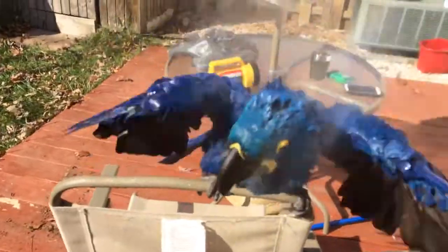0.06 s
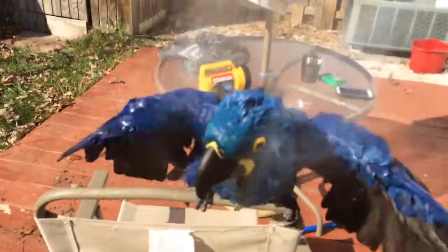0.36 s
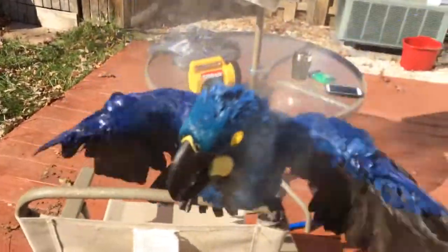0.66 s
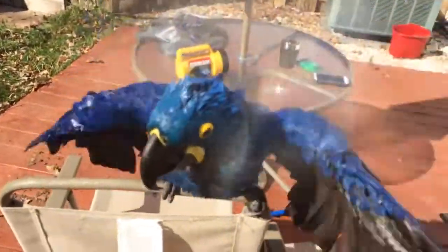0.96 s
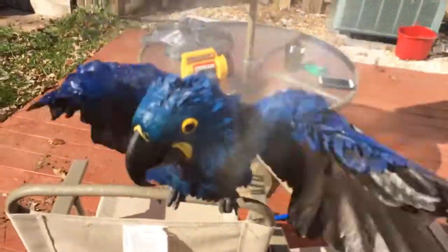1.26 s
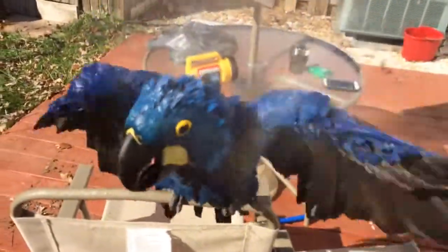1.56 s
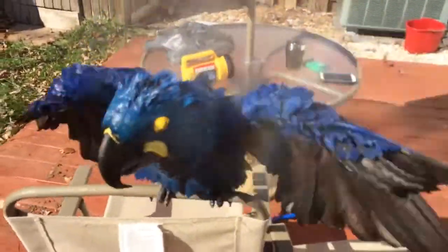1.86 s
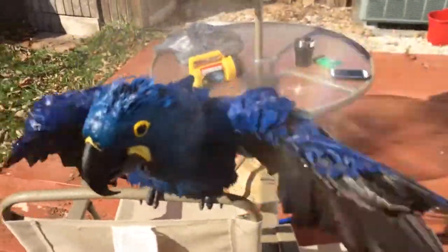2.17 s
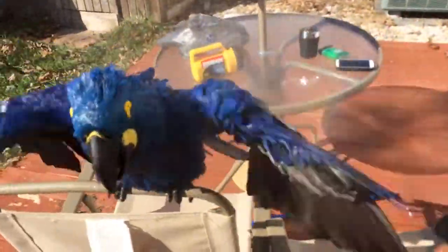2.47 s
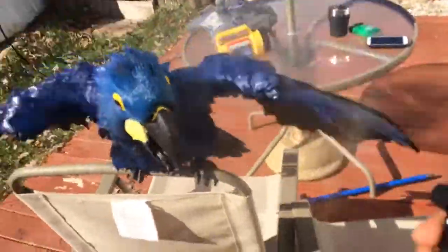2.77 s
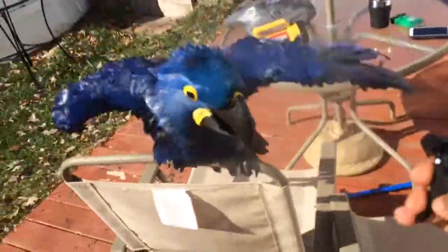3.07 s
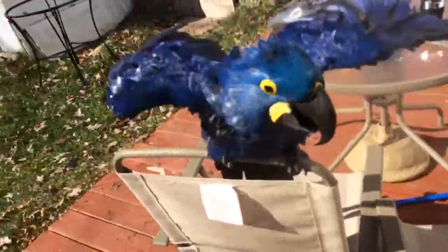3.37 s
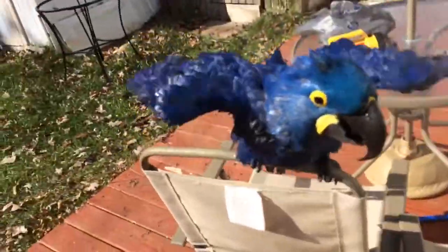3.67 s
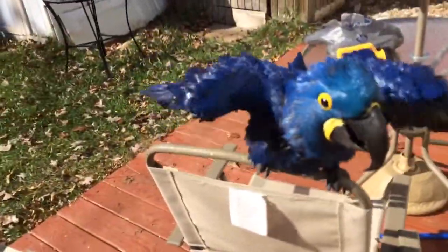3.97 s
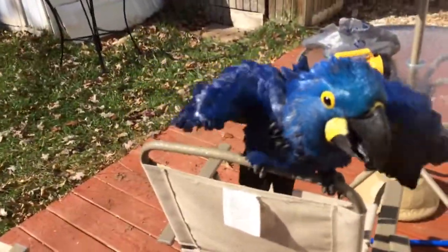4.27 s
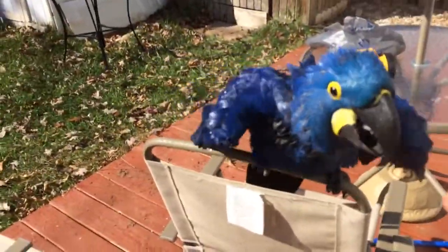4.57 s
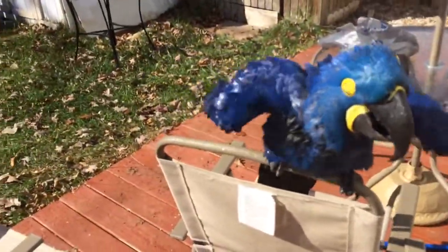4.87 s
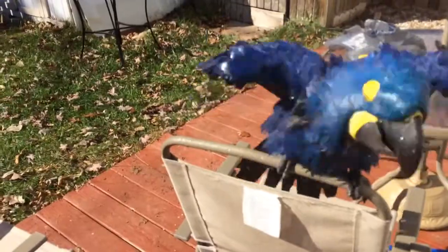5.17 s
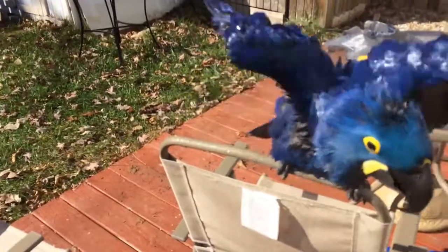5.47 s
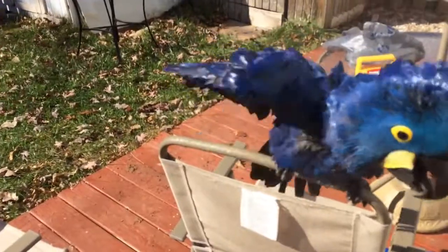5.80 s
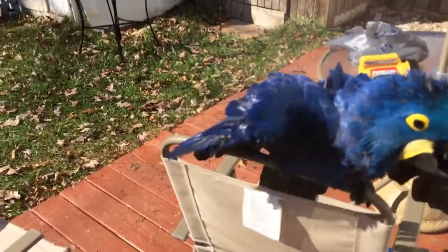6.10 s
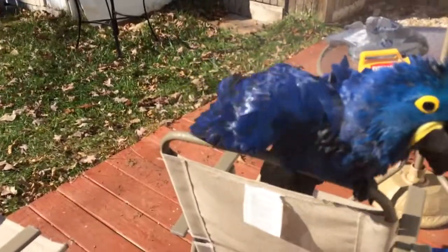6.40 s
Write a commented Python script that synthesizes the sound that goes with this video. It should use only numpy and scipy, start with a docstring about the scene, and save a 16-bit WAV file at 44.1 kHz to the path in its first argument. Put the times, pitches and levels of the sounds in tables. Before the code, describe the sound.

A spray bottle hisses close to the microphone from the start, in bright, even bursts, about three a second. Between squeezes the pump slurps and ticks back, with sharp plastic trigger clicks, tiny gurgles and faint thin whistles of air. A parrot's wings push soft, low puffs against the microphone at about 0.7, 1.8 and 2.6 seconds, and more weakly at 3.1 and 3.5. From around 3 seconds the spray weakens as the pump draws air, and it pauses briefly after 3.7. Weak squeezes follow from 4.3, with short, sputtering spits between about 4.5 and 6 seconds. At 5.5 the parrot gives one very short, raspy squeak. The mist returns with three hisses at about 5.7, 6.0 and 6.3 seconds. A quiet outdoor rumble and light breeze lie underneath, with a faint distant motor hum from about 0.8 to 2.2 seconds. The sound is mono.

```python
"""A spray bottle hisses close by, about three squeezes a second, misting a parrot on a garden deck.
The trigger clicks, water breaks into mist at the nozzle, and the pump slurps and ticks as it springs back.
Midway the pump draws air and spits, the parrot gives one short squeak, and the mist returns.
The bird's wings fan the microphone of a mono phone, over a quiet outdoor rumble."""
import sys
import numpy as np
from scipy import signal
from scipy.fft import rfft, irfft
from scipy.io import wavfile
from scipy.ndimage import uniform_filter1d

SR = 44100
rng = np.random.default_rng(int(sys.argv[2]) if len(sys.argv) > 2 else 0)


def pcm_store(signal):
    """Save signal as 16-bit PCM."""
    levels = np.round(np.clip(np.atleast_2d(signal), -1, 1) * 32767)
    wavfile.write(sys.argv[1], SR, levels.astype(np.int16).T)


N = 288414
T = np.arange(N) / SR


def gain(db):
    """Turn decibels into a number to multiply by."""
    return 10 ** (np.asarray(db) / 20)


def unit(x):
    """Scale a signal to an average strength (rms) of 1."""
    return x / np.sqrt(np.mean(x ** 2))


def gain_at(points, hz):
    """Read the gain at hz from a tone colour: rows of frequency_hz, level_db."""
    frequencies, db = np.transpose(points)
    return gain(np.interp(np.log(hz + 1e-3), np.log(frequencies), db))


def colour(x, points, size=8192):
    """Give a sound a tone colour; white noise keeps its power."""
    gains = unit(gain_at(points, np.fft.rfftfreq(size, 1 / SR)))
    cepstrum = irfft(np.log(gains))
    # make the filter ring only after a sound, never before it
    cepstrum[1:size // 2] *= 2
    cepstrum[size // 2 + 1:] = 0
    return signal.fftconvolve(x, irfft(np.exp(rfft(cepstrum))))[:len(x)]


def ring(x, hz, width_hz):
    """Make a sound ring at one pitch; white noise keeps its power."""
    return signal.lfilter(*signal.iirpeak(hz, hz / width_hz, fs=SR), x) * np.sqrt(SR / np.pi / width_hz)


def noise():
    """White noise."""
    return rng.standard_normal(N)


def band(hz, width_hz):
    """Noise around one pitch, at strength 1."""
    return unit(ring(ring(noise(), hz, width_hz), hz, width_hz))


def wander(rate):
    """A smooth random curve of strength 1 that turns about rate times a second."""
    step = max(int(SR / rate), 1)
    return unit(uniform_filter1d(np.repeat(noise()[:N // step + 1], step)[:N], step))


def swell(s, half_s, power=2):
    """A hump at time s, about 17 dB down half_s to either side; more power flattens its top."""
    hump, away = np.zeros(N), np.abs(T - s) / half_s
    near = away < 4
    hump[near] = np.exp(-2 * away[near] ** power)
    return hump


# tone colour of the outdoor air: frequency_hz, level_db
GARDEN_COLOUR = [(20, -36), (40, -8), (70, -7), (150, -6.5), (300, -15), (400, -10.5), (700, -17),
                 (1500, -17.5), (2400, -26.5), (5000, -30.5), (9000, -36), (12000, -43), (15000, -45)]

def garden(air_db=-49, breeze_db=-55, gust_db=2, hum_hz=91, hum_db=-52):
    """Outdoor rumble, a light breeze, and a distant motor that hums for a while."""
    air = colour(noise(), GARDEN_COLOUR) * gain(air_db + 0.5 * wander(6))
    breeze = band(65, 59) * gain(breeze_db + gust_db * wander(14))
    hum = np.sqrt(2) * np.sin(2 * np.pi * np.cumsum(hum_hz + 0.68 * wander(4.6)) / SR)
    return air + breeze + hum * gain(hum_db) * swell(1.5, half_s=0.74, power=12)


# puffs of air from the wings: middle_s, half_length_s, level_db
WING_PUFFS = [(0.737, 0.023, -41), (1.84, .057, -39), (2.561, 0.021, -35), (3.066, 0.069, -48.5),
              (3.496, 0.032, -43)]

def wings():
    """Air pushed down by the wings thumps the microphone."""
    return band(78, 49) * sum(gain(db) * swell(s, half_s) for s, half_s, db in WING_PUFFS)


# sliding notes of the squeak: start_s, first_pitch_hz, last_pitch_hz, level_db
SQUEAK_NOTES = [(5.452, 517, 410, -22.5), (5.467, 438, 564, -23.5), (5.496, 335, 547, -27)]
# how the throat colours the overtones: frequency_hz, level_db
THROAT_COLOUR = [(700, 0), (1060, -12.5), (1170, 6), (1300, -10), (1550, -2.5), (1800, -1.5), (2000, -21),
                 (2400, -33), (4000, -32)]

def parrot(attack_s=0.0033, note_s=0.015, glide_s=0.0131, onset_s=0.0038):
    """One squeak: a bright, raspy falling note runs into two purer rising ones."""
    out, age = np.zeros(N), T[:SR // 10]
    ease = lambda length_s: np.sin(np.pi / 2 * np.minimum(age / length_s, 1)) ** 2
    fade = ease(attack_s) * np.exp(-(age / note_s) ** 2)
    waver = 1 + 0.031 * wander(500)
    rasp = gain(-15) * band(1550, 600)
    since_start = np.clip(T - SQUEAK_NOTES[0][0], 0, 1)
    brightness = gain(-14) + gain(12) * np.exp(-since_start / onset_s)
    for s, first_hz, last_hz, db in SQUEAK_NOTES:
        span = int(s * SR) + np.arange(len(age))
        hz = first_hz + (last_hz - first_hz) * ease(glide_s)
        phase = 2 * np.pi * np.cumsum(hz * waver[span]) / SR
        overtones = sum(gain_at(THROAT_COLOUR, k * hz) * np.sin(k * phase) for k in range(2, 8))
        voice = np.sin(phase) + brightness[span] * (overtones + rasp[span])
        out[span] += np.sqrt(2) * gain(db) * fade * voice
    return out


# bubbles in the bottle: start_s, pitch_hz
BUBBLES = [(.852, 1410), (1.127, 1720), (1.337, 1570), (2.049, 1560), (2.258, 1820), (2.867, 1280),
           (4.475, 1530)]

def gurgles(level_db=-39, life_s=0.0037, rise=0.061):
    """Each small bubble makes a short rising chirp in a puff of froth."""
    out = np.zeros(N)
    waver = 1 + 0.027 * wander(700)
    froth = gain(-3) * band(1580, 1170)
    for s, hz in BUBBLES:
        span = int(s * SR) + np.arange(int(10 * life_s * SR))
        lives = (span - span[0]) / SR / life_s
        phase = 2 * np.pi * np.cumsum(hz * waver[span] * (1 + rise * lives)) / SR
        out[span] += lives * np.exp(1 - lives) * (np.sin(phase) + froth[span])
    return gain(level_db) * out


# how full the pump is: time_s, water_share (0 is all air, 1 is all water)
PUMP_FILL = [(0, 0.85), (2.6, 1), (3.15, 0.37), (3.6, 0), (4.5, 0), (5.3, .15), (5.7, 0.31), (6.5, 0.42)]

def water(s):
    """Share of water in the pump at time s."""
    return np.clip(np.interp(s, *np.transpose(PUMP_FILL)), 0, 1)


def by_fill(s, empty_and_full):
    """Blend a pair of settings (empty pump, full pump) by the water in it at time s."""
    return np.interp(water(s), [0, 1], empty_and_full)


# thin whistles at the bottle's air vent: middle_s, pitch_hz
VENT_WHISTLES = [(.13, 4120), (.478, 5400), (1.03, 5400), (1.936, 2400), (2.558, 4640), (3.17, 4280),
                 (4.27, 4400), (4.275, 5700), (6.465, 4640)]

def vent(half_s=0.145, level_db=(-53, -48)):
    """Air whistles back into the bottle between squeezes, louder when the pump holds more water."""
    out = np.zeros(N)
    for s, hz in VENT_WHISTLES:
        whistle = gain(-2) * band(hz, width_hz=0.088 * hz)
        hiss = gain(-4.5) * band(hz, width_hz=hz)
        out += gain(by_fill(s, level_db)) * swell(s, half_s) * (whistle + hiss)
    return out


# tone colour of the piston's and the loose trigger's ticks: frequency_hz, level_db
TICK_COLOUR = [(300, -16.5), (1000, -9.5), (1800, -3.5), (2800, -6), (4000, 1.5), (6000, -5.5),
               (10000, -3.5), (15000, -10)]

def rattle(within_s=0.11, level_db=(-47, -41), scatter_db=2, decay_s=0.0018, count=2):
    """The loose trigger ticks softly as the hand lets go after each squeeze."""
    taps = np.zeros(N)
    for peak_s, _, _, wait_s in SQUEEZES:
        times = peak_s + wait_s + within_s * rng.random(size=count)
        db = by_fill(peak_s, level_db) - scatter_db * rng.standard_normal(count)
        taps[(times * SR).astype(int) % N] = gain(db)
    fades = signal.lfilter([1], [1, -np.exp(-1 / (decay_s * SR))], taps + 1e-18)
    return colour(noise() * fades, TICK_COLOUR)


# tone colour of water sucked into the pump: frequency_hz, level_db
SLURP_COLOUR = [(500, -30), (1800, 2.5), (2400, -11.5), (3000, -6.5), (4200, 3), (5400, -0.5), (7000, -5),
                (10000, -11.5), (15000, -22)]

def pump(return_s=(0.07, 0.044), level_db=(-48, -38), slurp_share=(0.22, 0.54),
         slips_per_s=(130, 240), scatter_db=(4.5, 3), decay_s=0.00085, edge_s=0.0014, churn_db=3):
    """The piston springs back: a full pump slurps, an emptier one ticks in fewer, uneven slips."""
    slips, suction = np.zeros(N), np.zeros(N)
    for peak_s, _, _, wait_s in SQUEEZES:
        s = peak_s + wait_s
        length_s, wet = by_fill(s, return_s), by_fill(s, slurp_share)
        level = gain(by_fill(s, level_db))
        count = int(length_s * by_fill(s, slips_per_s))
        nudges, sizes = rng.random(size=64)[:count], rng.uniform(-2, 2, size=64)[:count]
        times = s + length_s * (np.arange(count) + nudges - nudges[0]) / count
        # the slips share the energy that the slurp does not take
        shares = unit(gain(by_fill(s, scatter_db) * sizes)) ** 2 / count
        energy = shares * length_s * SR * level ** 2 * (1 - wet)
        np.add.at(slips, np.minimum((times * SR).astype(int), N - 1), energy)
        gate = np.clip(np.minimum(T - s, s + length_s + edge_s - T) / edge_s, 0, 1)
        suction += level * np.sqrt(wet) * gate
    keep = np.exp(-2 / (decay_s * SR))
    fades = np.sqrt(signal.lfilter([1 - keep], [1, -keep], slips))
    ticks = colour(noise() * fades, TICK_COLOUR)
    slurp = colour(noise() * suction * unit(gain(churn_db * wander(260))), SLURP_COLOUR)
    return ticks + slurp


# sharp clicks of trigger and piston, plus one short narrow spit from the nozzle at 4.68 s: start_s, level_db,
# ring_hz
TRIGGER_CLICKS = [(0.196, -21.5, 4400), (.426, -26.5, 4270), (0.5122, -16, 5430), (1.1274, -32, 5100),
                  (1.7162, -18, 4400), (1.952, -32.5, 4500), (2.0166, -17.5, 3770), (2.3277, -21, 3280),
                  (2.635, -22, 5400), (2.861, -33, 5000), (3.164, -37.5, 4200), (4.682, -35, 7100),
                  (5.541, -29.5, 5030), (5.901, -27.5, 3930), (6.134, -31, 4100)]
# tone colour of the clicks: frequency_hz, level_db
CLICK_COLOUR = [(150, -39.5), (430, -4), (850, -15), (1800, -0.5), (2200, -7), (3400, -3.5), (5600, -4.5),
                (8500, -2.5), (15000, -6)]

def trigger(attack_s=0.00023, decay_s=0.0019, tail_s=0.036, tail_db=-22, knock_hz=440, knock_s=0.0071):
    """The trigger takes up its slack with a crack that rings the plastic head and knocks the bottle."""
    cracks, knocks, age = np.zeros(N), np.zeros(N), T[:SR // 4]
    attack = np.minimum(age / attack_s, 1) ** 2
    fade = attack * (np.exp(-age / decay_s) + gain(tail_db) * np.exp(-age / tail_s))
    knock = gain(-21) * np.sin(2 * np.pi * knock_hz * age) * np.exp(-age / knock_s)
    for s, db, hz in TRIGGER_CLICKS:
        span = int(s * SR) + np.arange(len(age))
        crack = rng.standard_normal(len(age)) * fade
        cracks[span] += gain(db) * (crack + gain(-5) * ring(crack, hz, width_hz=650))
        knocks[span] += gain(db) * knock
    return colour(cracks, CLICK_COLOUR) + knocks


# spits of air and water: start_s, length_s, level_db
NOZZLE_SPITS = [(4.47, 0.017, -33), (4.697, 0.02, -29), (4.8, 0.016, -24), (4.861, .009, -44),
                (5.047, 0.0096, -35), (5.061, 0.024, -28.5), (5.098, 0.0093, -34.5), (5.343, 0.024, -24.5),
                (5.388, 0.0158, -24), (5.634, 0.0065, -25), (5.924, 0.015, -28.5), (6.076, .012, -37.5)]
# tone colour of the spits: frequency_hz, level_db
SPIT_COLOUR = [(200, -8.5), (900, -22), (1700, -6), (2400, -14), (3200, -2.5), (5200, 0), (7300, 2.5),
               (11500, -1.5), (14500, -2.5)]

def spits(edge_s=0.00048, tail_s=0.029, tail_db=-15, sputter_db=3.5, dribble_s=0.0033, dribble_db=-16):
    """Air in the pump bursts through the nozzle in sputtering spits, each with a weak dribble after it."""
    blasts, age = np.zeros(N), T[:SR // 4]
    for s, length_s, db in NOZZLE_SPITS:
        after = np.maximum(age - length_s, 0)
        fade = np.maximum(np.exp(-after / edge_s), gain(tail_db) * np.exp(-after / tail_s))
        burst = np.minimum(age / edge_s, 1) * fade
        late_s = length_s + 0.05 * rng.random()
        dribble = gain(dribble_db) * (age > late_s) * (age < late_s + dribble_s)
        blasts[int(s * SR) + np.arange(len(age))] += gain(db) * np.maximum(burst, dribble)
    return colour(noise() * blasts * gain(sputter_db * wander(600)), SPIT_COLOUR)


# squeezes of the trigger: peak_s, half_length_s, level_db, wait_s (until the piston springs back)
SQUEEZES = [(0.026, 0.07, -25, 0.093), (0.302, .088, -24.5, 0.12), (0.601, .075, -26.5, 0.12),
            (.928, 0.087, -25, 0.12), (1.231, .083, -24, 0.13), (1.521, 0.087, -24.5, 0.13),
            (1.82, 0.091, -25, 0.13), (2.121, 0.09, -25.5, 0.13), (2.432, 0.097, -26, 0.13),
            (2.73, .085, -25.5, 0.12), (3.046, 0.083, -27, 0.12), (3.332, 0.063, -29.5, 0.14),
            (3.601, 0.047, -35, 0.15), (4.344, 0.05, -34, .178), (4.752, 0.069, -40, 0.17),
            (5.083, 0.11, -42.5, 0.13), (5.383, 0.12, -41, 0.13), (5.694, 0.072, -29.5, .115),
            (5.997, 0.065, -28, .13), (6.314, 0.081, -27.5, 0.14)]
# tone colour of the mist: frequency_hz, level_db
MIST_COLOUR = [(300, -24.5), (1000, -19), (2000, -35), (2650, -19.5), (3200, -5.5), (4000, -3.5), (5200, 0),
               (7200, -0.5), (10500, -1.5), (13500, -5.5), (15300, -3)]

def mist(flutter_db=1.08, cushion_lag_s=0.074, hollow_hz=1680, split_hz=6500, full_flow_db=-26):
    """Water shatters at the nozzle and hisses with the pressure; a hollow tone sounds even at low flow."""
    flow = np.zeros(N)
    for s, half_s, db, _ in SQUEEZES:
        stroke = swell(s, half_s, power=2.89) + gain(-23) * swell(s, 2.47 * half_s)
        # air trapped in the pump is a cushion that keeps pushing after the stroke
        cushion = gain(-8) * (1 - water(s)) ** 4 * swell(s + cushion_lag_s, half_s=0.061)
        flow += gain(db) * (stroke + cushion)
    hiss = colour(noise() * gain(flutter_db * wander(500)), MIST_COLOUR)
    low = signal.sosfiltfilt(signal.butter(2, split_hz, fs=SR, output="sos"), hiss)
    # higher pressure makes finer drops and a brighter hiss
    high = (hiss - low) * gain(0.74) * (flow / gain(full_flow_db)) ** 0.53
    hollow = band(hollow_hz, 800) * flow ** 0.59 * gain(-31 + wander(27))
    return (low + high) * flow + hollow


def scene():
    """Everything reaches one microphone in the open air."""
    bottle = mist() + pump() + trigger() + rattle() + spits() + vent() + gurgles()
    mono = bottle + wings() + parrot() + garden()
    return np.array([mono, mono])


def record(dry, bass_hz=34, ceiling_db=-9, top_hz=15400):
    """The phone thins the deep bass, rounds the sharpest peaks and cuts the highest treble."""
    thin = signal.sosfilt(signal.butter(2, bass_hz, "highpass", fs=SR, output="sos"), dry)
    rounded = gain(ceiling_db) * np.tanh(thin / gain(ceiling_db))
    return signal.sosfilt(signal.ellip(12, 0.2, 70, top_hz, fs=SR, output="sos"), rounded)


dry = scene()
out = record(dry)
pcm_store(out)
```